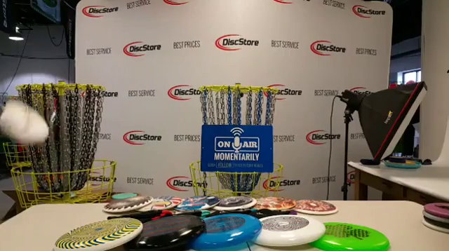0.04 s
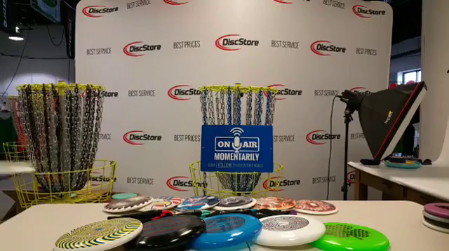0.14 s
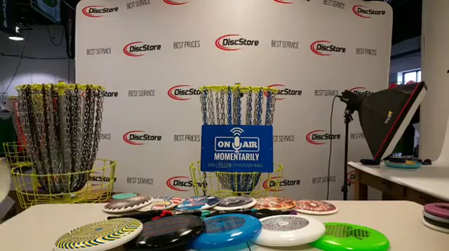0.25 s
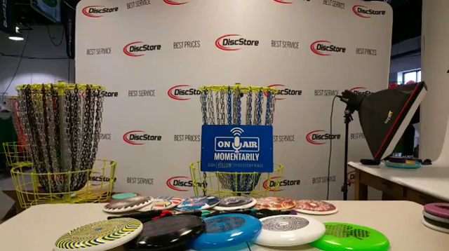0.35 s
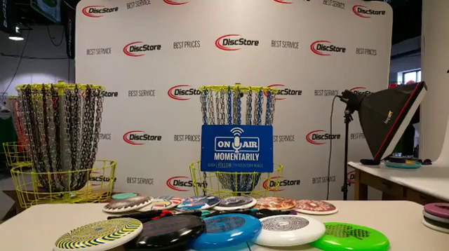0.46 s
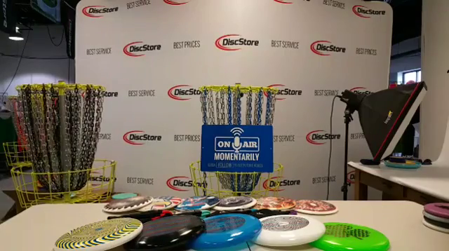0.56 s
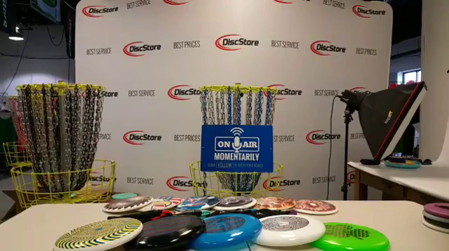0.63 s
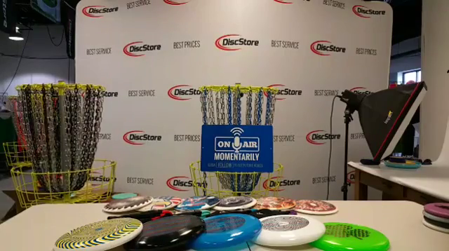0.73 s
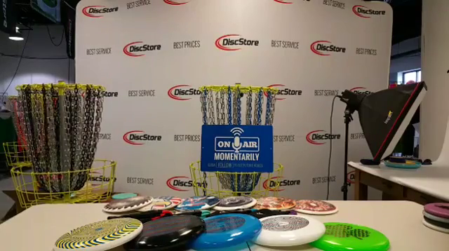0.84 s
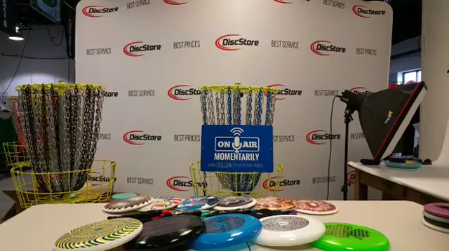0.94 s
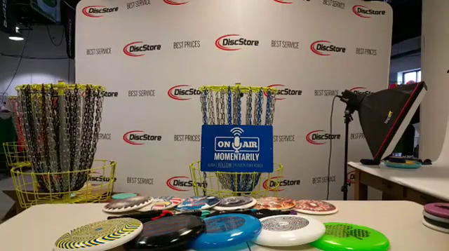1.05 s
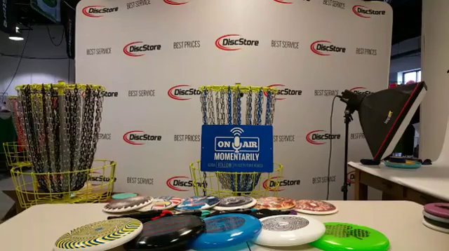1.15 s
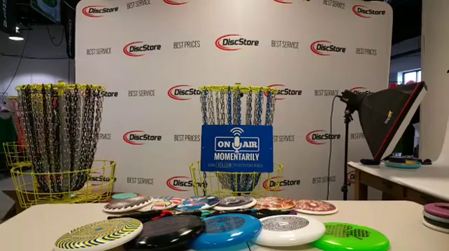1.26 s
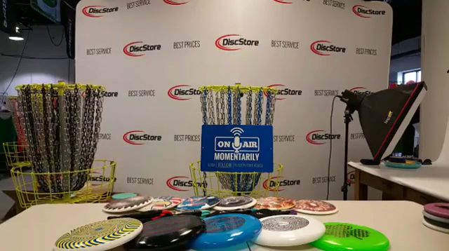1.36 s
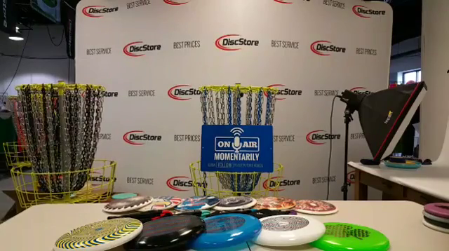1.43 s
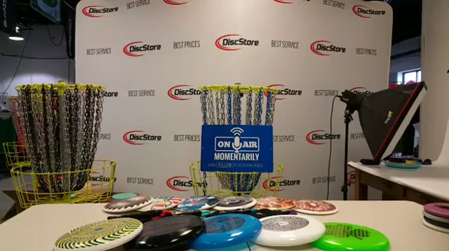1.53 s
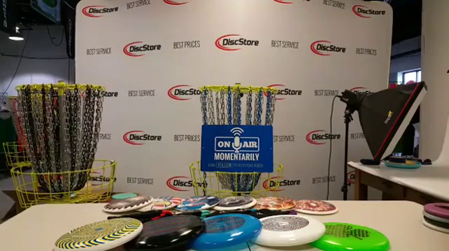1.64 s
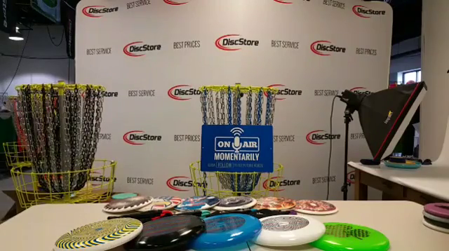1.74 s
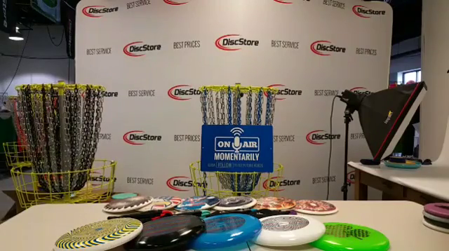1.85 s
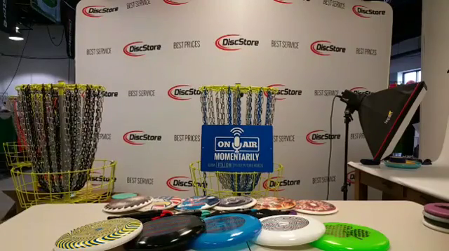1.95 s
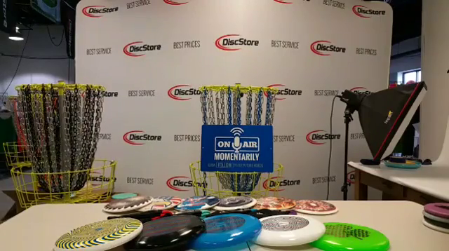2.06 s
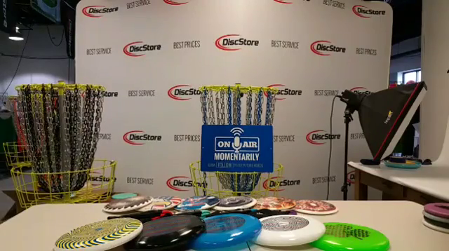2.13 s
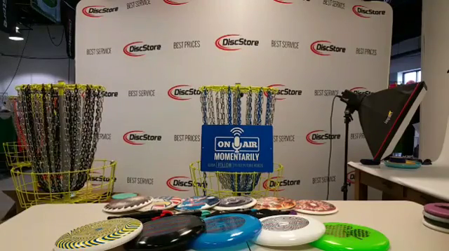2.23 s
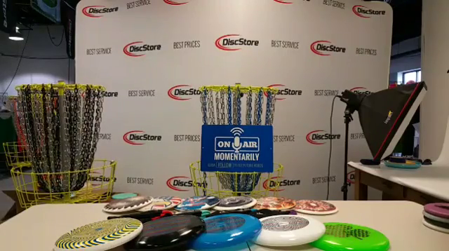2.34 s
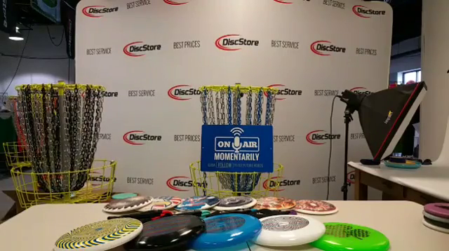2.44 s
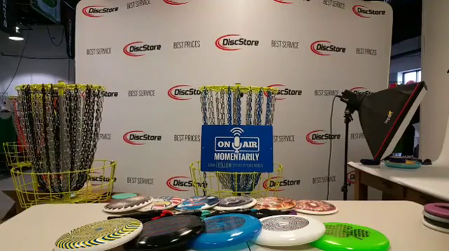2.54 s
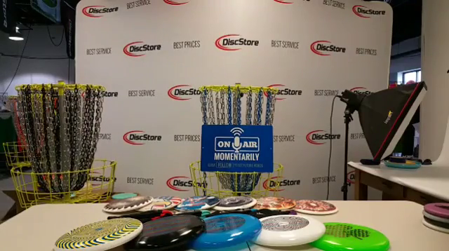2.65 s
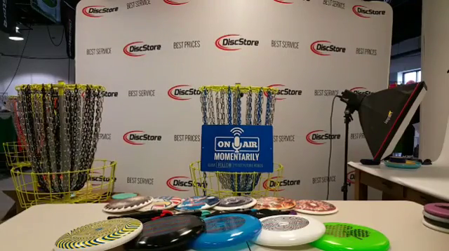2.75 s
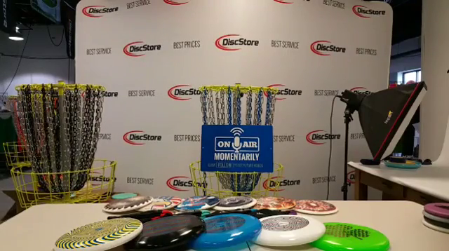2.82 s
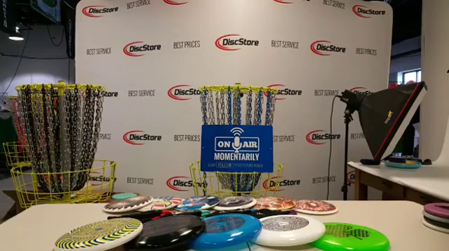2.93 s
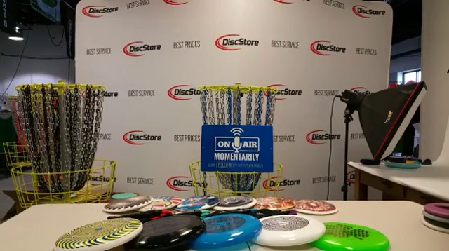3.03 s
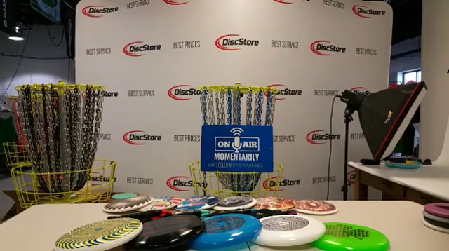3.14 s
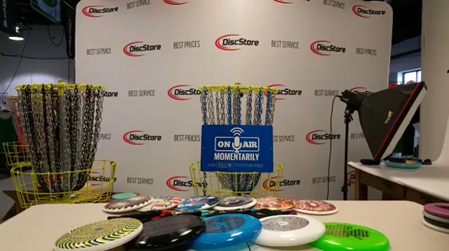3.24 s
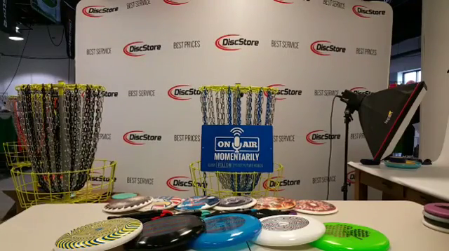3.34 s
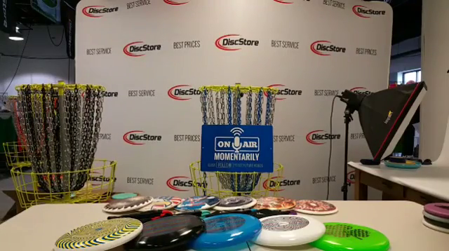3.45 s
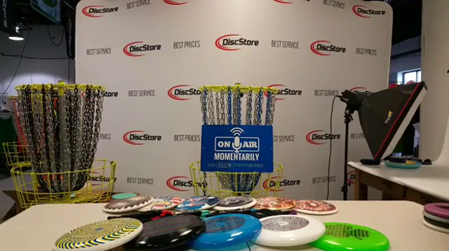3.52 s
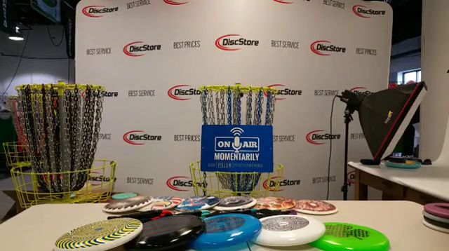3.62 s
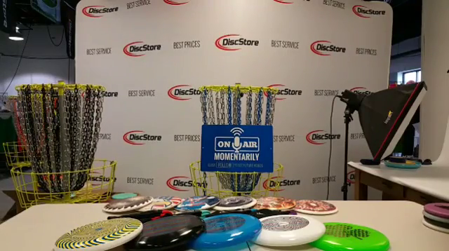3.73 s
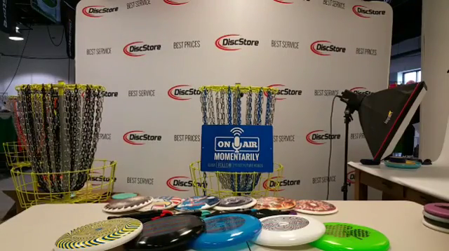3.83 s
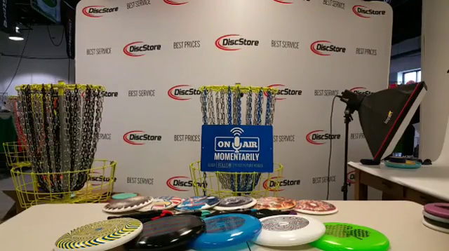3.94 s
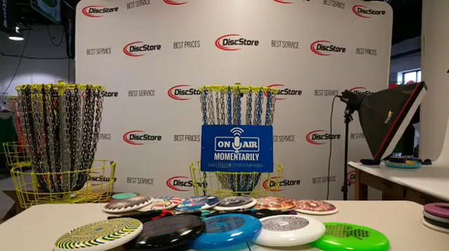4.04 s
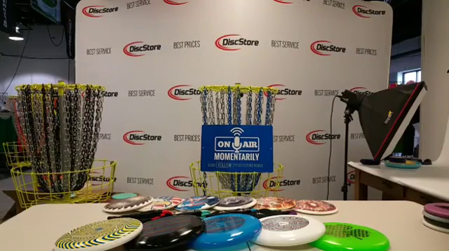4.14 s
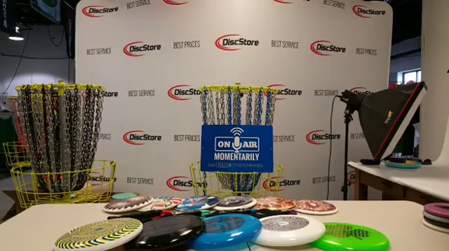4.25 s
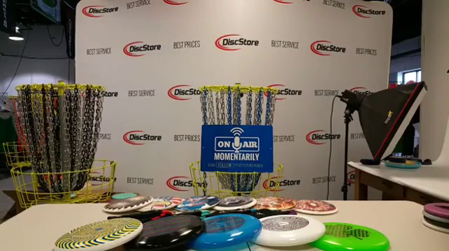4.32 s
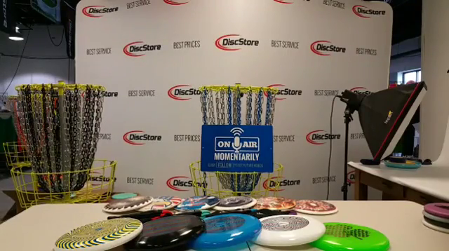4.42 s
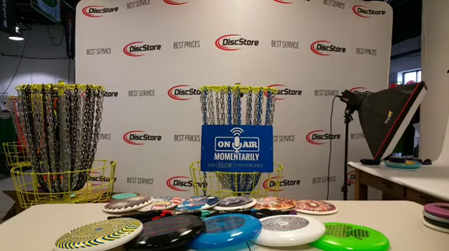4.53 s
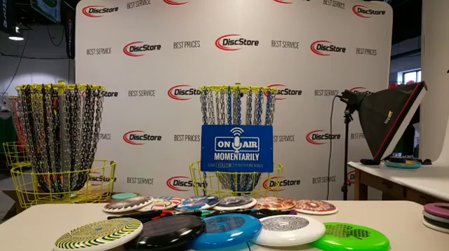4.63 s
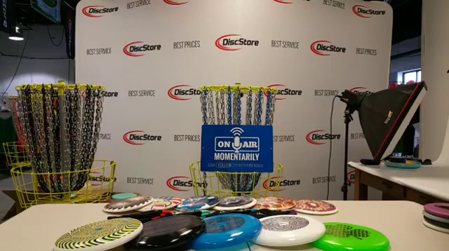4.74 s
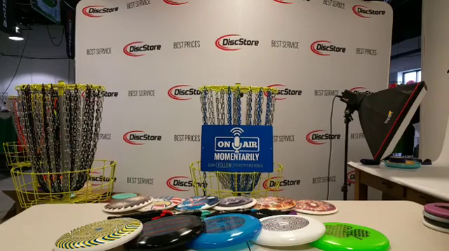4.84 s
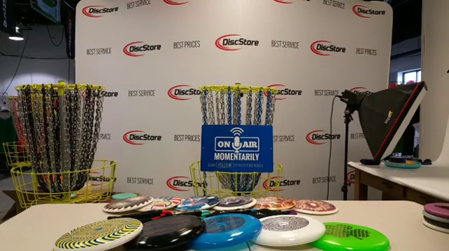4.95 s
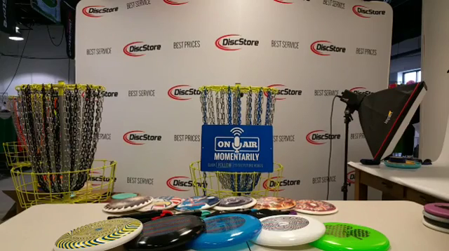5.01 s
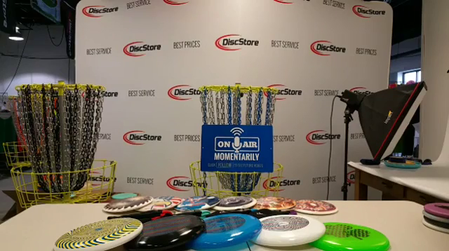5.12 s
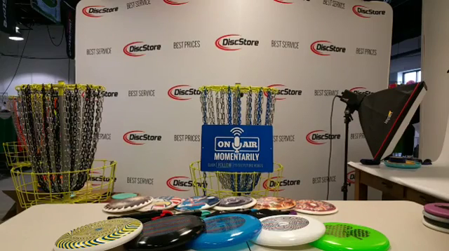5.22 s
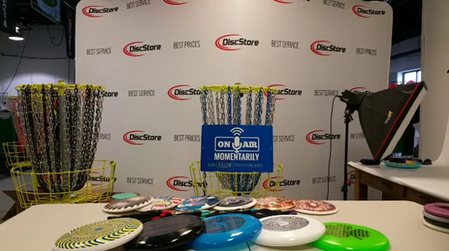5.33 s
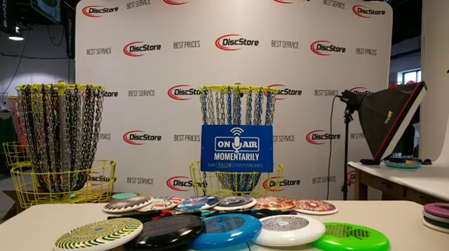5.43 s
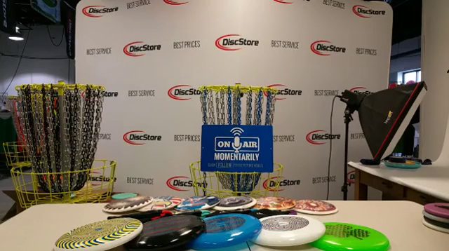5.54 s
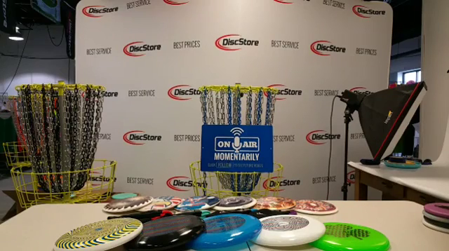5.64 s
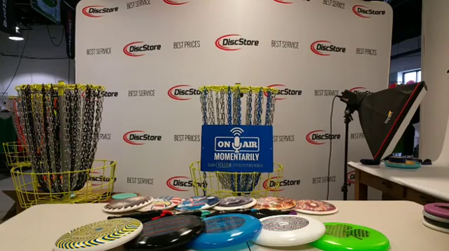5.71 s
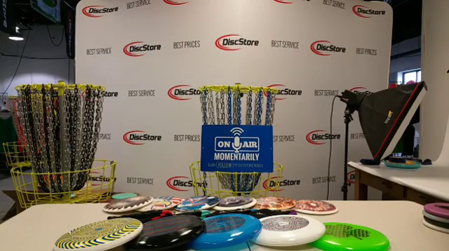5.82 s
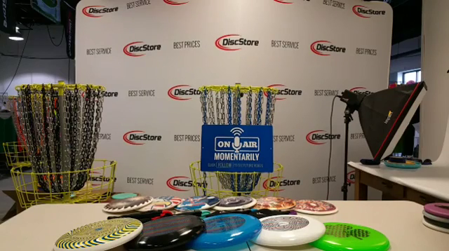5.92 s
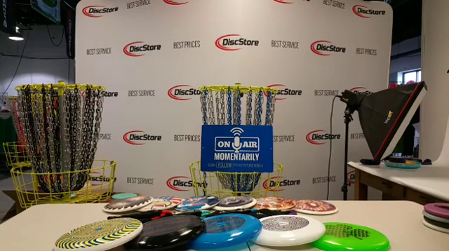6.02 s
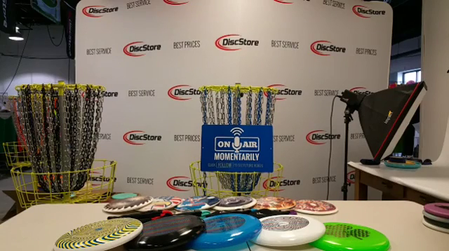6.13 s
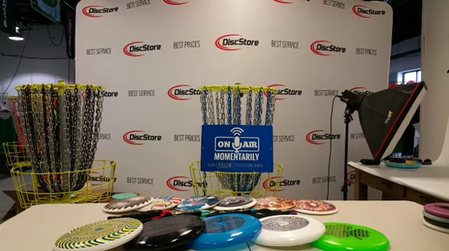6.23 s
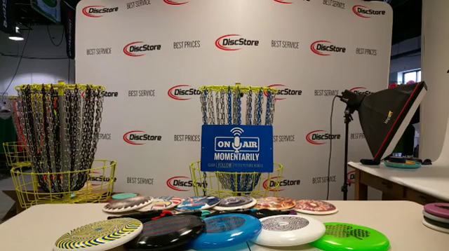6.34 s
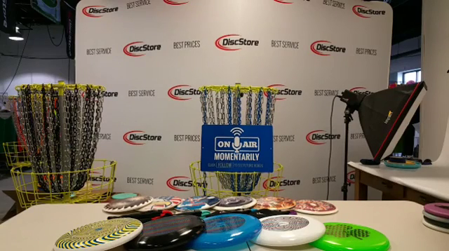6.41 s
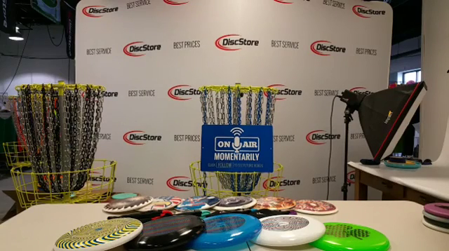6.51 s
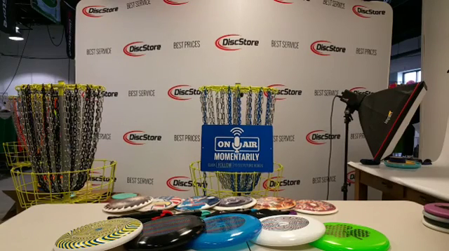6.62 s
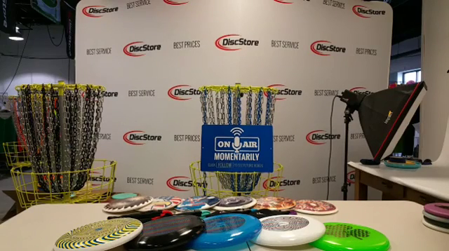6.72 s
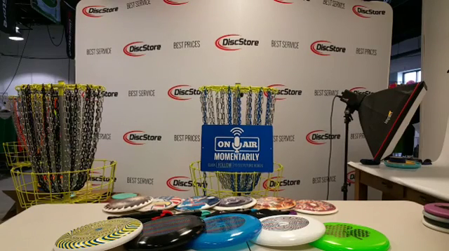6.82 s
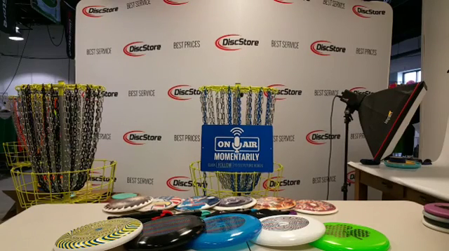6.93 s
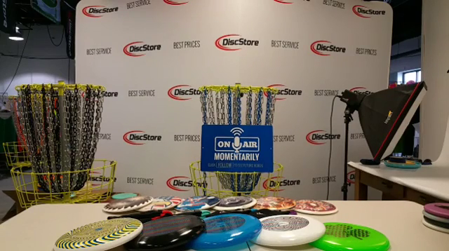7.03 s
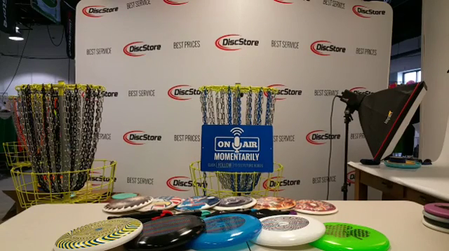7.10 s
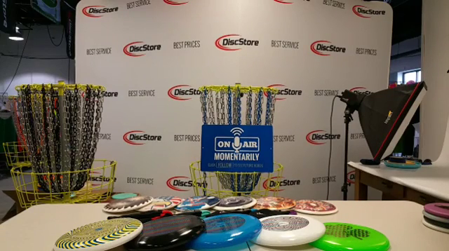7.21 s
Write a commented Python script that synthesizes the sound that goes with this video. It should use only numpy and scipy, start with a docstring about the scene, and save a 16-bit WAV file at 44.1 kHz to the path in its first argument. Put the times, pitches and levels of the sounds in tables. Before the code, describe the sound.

Sudden chain crash and metal clang, hard plastic bounces with fading jingle, a long knocking roll, a sinking hum, a flat slap, then faint rustling.

```python
"""Disc into a chain basket

A plastic flying disc crashes into the chains of a steel basket in a shop, clangs off the wire tray and drops out.
It bounces while the chains jingle, rolls away on its rim, leans and slaps flat; thumps and a brief rustle follow.
Contacts are filtered impulses with noise chatter; links, frame and disc ring as decaying sines.
Rolling, rustle and ventilation are shaped noise; the leaning hum is a sinking sine with noisy resonances.
"""
import sys
import numpy as np
from scipy import signal
from scipy.io import wavfile
from scipy.ndimage import uniform_filter1d

SR = 44100
rng = np.random.default_rng(int(sys.argv[2]) if len(sys.argv) > 2 else 0)


def unload_audio(sound):
    """Save the sound as a 16-bit wav file, at the path given as the first command line argument."""
    columns = np.transpose(np.atleast_2d(sound))
    # keep every value between -1 and 1, then stretch to whole-number steps
    steps = np.round(np.clip(columns, -1, 1) * 32767)
    wavfile.write(sys.argv[1], SR, steps.astype(np.int16))


N = 320552
T = np.arange(N) / SR
EDGE_HZ = 14080  # upper band limit

# Blows: (time [s], relative level over 10 ms [dB], tilt [dB/octave],
#         chatter energy re first contact [dB], chatter t60 [s])
CHAIN_BLOWS = [(.0395, -18, 3, 2.5, 0.031), (.0488, -23.5, 2.5, 3.5, 0.027), (.0522, -20, -0.5, 12, 0.06),
               (.0824, -23.5, -3.5, -2, 0.03)]
TRAY_BLOWS = [(.2385, -38, 7.5, 20, 0.0073), (.2410, -24.5, 4, -11, 0.01), (.2430, -24, 1.5, -8.5, 0.098),
              (.2450, -19, -5.5, 9, 0.034), (.2595, -34.5, -8.5, 1, .05), (.3330, -36, -0.5, 1, 0.029)]
FLOOR_BLOWS = [(.6130, -20.5, 0.5, 0, 0.07), (0.619, -34, 17, 1, 0.063), (0.633, -20.5, -6, -13, 0.051),
               (0.7327, -28, -0.5, 7.5, 0.14), (0.8923, -38.5, 2, 16, 0.14), (.9800, -34.5, 0, 4, 0.15)]
FLAT_BLOWS = [(5.028, -45, -4.5, 1, 0.041), (5.1900, -32, 0.5, -6.5, 0.041)]
THUMP_BLOWS = [(2.085, -57, -6, 5.4, 0.13), (2.305, -55, -3.5, 6, 0.1), (4.493, -51, -2.5, 2.1, 0.026),
               (5.944, -42.5, -1, 4.4, 0.078), (6.716, -59, -0.5, 5.5, 0.034)]
# Contact spectra: (frequency [Hz], relative level [dB per Hz])
CHAIN_SPECTRUM = [(120, -34.5), (200, -6.5), (276, 5), (408, -8), (596, -9.5), (742, -1.5), (910, 0),
                  (1010, -5.5), (1650, -6), (1940, -10.5), (2120, -6.5), (3420, -12.5), (3680, -13),
                  (5790, -27), (6500, -40), (8450, -33), (14300, -120)]
TRAY_SPECTRUM = [(120, -22.5), (200, -23), (334, -7.5), (520, 0.5), (680, 6), (850, -7), (1000, -5),
                 (1120, -6), (1400, -6), (1920, -3), (2100, -7), (2420, -7.5), (2750, -14.5), (3700, -17),
                 (6000, -32), (7800, -55), (14000, -30)]
FLOOR_SPECTRUM = [(29, -69), (50, -21), (109, -8.5), (192, -26.5), (267, 2), (346, -14.5), (504, 1),
                  (581, -9.5), (789, -10), (1070, -15), (2390, -19.5), (5330, -29.5), (8330, -46.5),
                  (11900, -40), (14000, -60)]
FLAT_SPECTRUM = [(60, -22), (150, -16.5), (330, -8), (450, -1), (600, -3.5), (740, -2.5), (1000, -6.5),
                 (1300, -16.5), (1800, -19), (2500, -28.5), (5600, -31.5), (7200, -48), (14000, -63)]
THUMP_SPECTRUM = [(50, -27), (90, -7), (150, -1.5), (310, -6), (380, -8.5), (480, -4), (600, -5),
                  (750, -14), (910, -6.5), (1020, -18), (2000, -25), (5500, -26), (8000, -43), (14000, -35)]
KNOCK_SPECTRUM = [(60, -8), (150, -21.5), (310, 1), (490, 5.5), (600, 4), (780, -2), (1100, -6.5),
                  (1500, -16.5), (2200, -21.5), (4000, -39), (8000, -57.5)]

# Bright clatter: chains shaken together, and the treble of the disc hitting the floor:
# (time [s], relative clinking [dB], settling t60 [s], relative free ringing [dB])
CLATTER = [(0.037, -28.5, 0.3, -38), (0.238, -32.5, 0.12, -46), (0.494, -41, 0.17, -51),
           (.617, -30.5, 0.044, -58), (.750, -52, 0.23, -69), (1.188, -60.5, 0.076, -75),
           (1.51, -63.5, 0.16, -66)]
# Lingering jingle of the swinging chains: (time [s], relative clinking [dB], relative free ringing [dB])
CHAIN_SWAY = [(0.251, -43.5, -53), (.48, -50.5, -42), (.8, -67.5, -71), (1.3, -74, -79), (1.62, -81, -65),
              (1.85, -78.5, -85), (5.8, -78.5, -80)]
# Clink spectrum: (frequency [Hz], relative level [dB])
CLINK_SPECTRUM = [(700, -2.5), (1600, -4.5), (2300, -5), (3000, -4.5), (3800, -1.5), (5000, -8), (6500, -9),
                  (7500, -18.5), (9000, -9), (10000, -12), (12000, -9), (13300, -11), (14300, -5)]
# Loose steel link: (nominal frequency [Hz], relative level [dB])
LOOSE_LINK_MODES = [(2169, -49), (2245, -65), (2396, -59), (3644, -55), (3790, -62), (4543, -65.5),
                    (6110, -60), (8764, -57.5), (8861, -63), (10207, -66), (10955, -51.5), (11946, -70),
                    (13124, -53), (13170, -56)]
LINK_T60_S = 0.35
# Single links: (time [s], amplitude per link [dB], centre frequency [Hz], t60 [s])
LINK_PINGS = [(0.138, -57, 8300, .12), (.400, -69, 7960, 0.12), (0.498, -52, 6670, 0.23),
              (.498, -61, 7200, 0.07), (.752, -54.5, 3750, 0.11), (0.769, -52.5, 3055, 0.11),
              (0.754, -73, 12600, 0.098), (1.515, -62.5, 3870, 0.13), (4.399, -78.5, 3940, 0.39)]

# Steel frame and tray: (frequency [Hz], relative level [dB], t60 [s])
FRAME_MODES = [(80.3, -8.5, 0.65), (242.6, -3, 0.461), (282, -16, 0.2), (522, 0.5, 0.88), (764, -11.5, 1.4),
               (930, -12, .3), (996, -9, .3), (1292, -20, .55), (1440, -17.5, 0.42), (1841, -7.5, 0.55),
               (2280, -9.5, 2.4), (2245, -11.5, 0.77), (2600, -13, 0.33), (2642, -37, .3), (3680, -6, 0.35),
               (3800, -32, .6)]
# Knocks on the frame: (time [s], gain [dB])
FRAME_KNOCKS = [(0.049, -39.5), (.243, -40.5)]
# Disc flexing against the floor: (frequency [Hz], relative level [dB], t60 [s])
DISC_BOOM_MODES = [(82, -14, 0.86), (239, -0.5, 0.32), (291, -10, 0.2), (339.5, -0.5, 0.2),
                   (483.4, 6.5, 0.18), (589, -29, .22), (725, -29, 0.25), (800, -20, 0.077)]
# Disc lying on the floor: (frequency [Hz], amplitude [dB], t60 [s])
DISC_FLAT_MODES = [(472, -39.5, 0.21), (580, -51, 0.42), (746, -41, 0.36), (2070, -75, 0.22),
                   (2390, -55, .2)]

# Rumble of the rolling rim: (time [s], relative level [dB])
ROLL_LEVEL = [(1.0, -53.5), (1.23, -59.5), (3.74, -56.5), (3.86, -52.5), (4.46, -57), (4.72, -50.5),
              (5.0, -62)]
# Rumble spectrum: (frequency [Hz], relative level [dB per Hz])
ROLL_SPECTRUM = [(65, -61), (110, -25), (178, -7.5), (215, -27), (306, -1), (395, -17), (478, 5), (526, -8),
                 (588, -3), (647, -9.5), (748, -3), (810, -24.5), (1060, -11.5), (1440, -27), (5000, -38.5),
                 (6500, -87), (11000, -120)]
SKID_DB, SKID_S = 14, 0.23  # the rim skids at first, until it grips
# Separate rim knocks: last hops of the landing, then irregular knocks while rolling:
# (time [s], relative level [dB], tilt [dB/octave])
SEPARATE_KNOCKS = [(1.017, -32, 0), (1.091, -33, 2.5), (1.145, -36, 3.5), (1.498, -41.5, 4),
                   (1.93, -43.5, 2.5), (2.185, -43.5, 5), (2.334, -38.5, .5), (2.766, -45.5, 2),
                   (2.998, -40.5, 3), (3.495, -38, 1.5), (4.437, -42.5, 4.5), (4.649, -42, 5.5)]
# A nick in the rim knocks once a turn; levels here are relative
TURN_START_S, TURN_S, TURN_COUNT = 1.562, 0.2515, 8
TURN_DB, TURN_FADE_DB_PER_S, TURN_TILT_DB_PER_OCT = -37, -4.5, 1.5
# The disc then wobbles: each interval is a share of the one before
WOBBLE_START_S, WOBBLE_S, WOBBLE_SHARE, WOBBLE_COUNT = 3.692, 0.158, 0.955, 10
WOBBLE_DB, WOBBLE_FADE_DB_PER_S, WOBBLE_TILT_DB_PER_OCT = -37, -8, 0.5
# Grit under the rim, met at random
GRIT_PER_S, GRIT_DB, GRIT_SPREAD_DB, GRIT_TILT_DB_PER_OCT = 6.1, -52, 3, 1

# Leaning disc rocking onto its humming rim: (time [s], relative level [dB], t60 [s])
LEAN_ROCKS = [(4.698, -45.5, 0.61), (4.774, -45.5, 0.5), (4.879, -35.5, 0.066)]
HUM_HZ, SAG_START_S, SAG_HZ_PER_S = 492, 4.71, 330
HUM_RISE_S, HUM_ROUGH_GAIN = 0.0042, 0.4

# Ticks: (time [s], level over 10 ms [dB], centre frequency [Hz], half-width at -6.5 dB [octaves])
SMALL_TICKS = [(3.526, -66.5, 7000, 1), (4.834, -60, 1250, 0.55), (5.009, -64, 1695, 0.31),
               (6.663, -65, 8900, 0.97), (6.993, -73, 5700, 0.17)]
# Rustle: (time [s], relative level [dB])
RUSTLE_LEVEL = [(5.95, -70), (6.13, -73), (6.35, -78), (6.49, -77), (6.57, -68), (6.66, -74), (6.71, -81)]
# Rustle spectrum: (frequency [Hz], relative level [dB per Hz])
RUSTLE_SPECTRUM = [(1000, 2), (3000, 2), (6000, -3), (9000, -9.5), (14000, -3.5)]

# Air noise spectrum: (frequency [Hz], relative level [dB per Hz])
AIR_SPECTRUM = [(15, -55.5), (25, -34), (42, -21), (80, -8), (144, -10.5), (231, -3), (271, -9),
                (353, -2.5), (436, -7), (569, -12.5), (666, -10), (1290, -12), (1780, -17), (3350, -24),
                (14000, -36.5)]
AIR_RMS_DB = -64.5
# Fan lines: (frequency [Hz], rms level [dB])
FAN_TONES = [(362, -74.5), (396, -86), (465, -77), (582, -76), (718, -79), (1310, -80)]
# Near reflections: (delay [s], relative gain [signed ratio])
NEAR_ECHOES = [(.0068, 1), (.0085, -0.035), (0.0137, -0.63), (0.0213, 0.33)]
# Room decay: (frequency [Hz], t60 [s])
ROOM_DECAY = [(100, 0.33), (400, 0.47), (1000, 0.418), (3000, 0.46), (7000, 0.36), (14000, 0.19)]


def amp(db):
    """Decibels to amplitude ratio."""
    return 10 ** (np.asarray(db) / 20)


def unit(x):
    """Scale to an rms of 1."""
    return x / np.sqrt(np.mean(x ** 2) + 1e-20)


def read(points, hz):
    """Interpolate a table on a log-frequency axis."""
    f, value = np.transpose(points)
    return np.interp(np.log(hz + 1), np.log(f + 1), value)


def fade(t, t60):
    """Exponential decay by 60 dB in t60 seconds, 1 ms at least."""
    return np.exp(-np.log(1000) * t / np.maximum(t60, 1e-3))


def level(s, db):
    """Gain curve, linear in dB, silent outside its span."""
    return amp(np.interp(T, s, db)) * (T > s[0]) * (T < s[-1])


def add(mix, s, sound):
    """Mix a sound in at s seconds."""
    part = mix[max(round(s * SR), 0):][:len(sound)]
    part += sound[:len(part)]


def colour(x, tone, tilt_db=0, lag=0, size=8192):
    """Causal filter from a spectrum, tilted in dB/octave; low bending waves trail the high by lag seconds."""
    hz = np.fft.fftfreq(size, 1 / SR)
    octaves = np.log2(np.clip(abs(hz), 200, 6000) / 1000)
    log_gain = np.log(amp(np.maximum(read(tone, abs(hz)) + tilt_db * octaves, -100)))
    minimum_phase = np.conj(signal.hilbert(log_gain))
    dispersion = 2 * np.pi * lag * 4000 * np.arctan(hz / 4000)
    taps = np.fft.ifft(np.exp(minimum_phase - 1j * dispersion)).real
    return signal.oaconvolve(x, taps[:size // 2])[:len(x)]


def ring(modes):
    """Sum of decaying sine modes, cut at one second."""
    t = T[:SR]
    return sum(amp(db) * fade(t, t60) * np.sin(2 * np.pi * hz * t) for hz, db, t60 in modes)


def blow(tone, db, tilt_db, chatter_db, chatter_t60, lag=0):
    """A sharp contact, then a quick chatter of smaller ones."""
    t = T[:SR // 4]
    chatter = rng.standard_normal(len(t)) * rng.exponential(1, len(t)) * fade(t, chatter_t60)
    force = amp(chatter_db) * chatter / np.linalg.norm(chatter)
    force[0] += 1
    sound = colour(force, tone, tilt_db, lag)
    return amp(db) * sound / np.linalg.norm(sound) * np.sqrt(SR / 100)  # level over 10 ms


def blows(rows, tone, lag=0):
    """Play a table of contacts with one spectrum."""
    out = np.zeros(N)
    for s, *shape in rows:
        add(out, s, blow(tone, *shape, lag))
    return out


def fuzzy_tone(hz, width_hz):
    """A narrow resonance fed by noise, following a pitch curve."""
    noise = rng.standard_normal(N) + 1j * rng.standard_normal(N)
    wander = signal.sosfilt(signal.butter(2, width_hz / 2, fs=SR, output="sos"), noise)
    carrier = np.exp(2j * np.pi * np.cumsum(hz * np.ones(N)) / SR)
    return unit((wander * carrier).real)


def basket():
    """The disc strikes the chains, then the tray; bright clatter and link pings go with it."""
    chain_hits = amp(-3.5) * blows(CHAIN_BLOWS, CHAIN_SPECTRUM, lag=0.0027)
    tray_hits = blows(TRAY_BLOWS, TRAY_SPECTRUM, lag=0.00195)
    return chain_hits + tray_hits + clatter() + pings()


def clatter(clinks_per_s=1000, rise_s=0.0014, clink_t60_s=0.074, detune=0.00059, count=28):
    """Random showers of short clinks and ringing loose links: shaken chains, and the floor hit's treble."""
    sway_s, sway_clink_db, sway_ring_db = np.transpose(CHAIN_SWAY)
    clinking = level(sway_s, sway_clink_db)
    ringing = level(sway_s, sway_ring_db)
    for s, clink_db, t60, ring_db in CLATTER:
        swell = (1 - np.exp(-T[:SR] / rise_s)) * fade(T[:SR], t60)
        add(clinking, s, amp(clink_db) * swell)
        add(ringing, s, amp(ring_db) * swell)

    t, clinks, rings = T[:SR // 3], np.zeros(N), np.zeros(N)
    for _ in range(count):
        at = rng.integers(0, N, round(clinks_per_s / count * N / SR))
        strength = rng.choice([-1, 1], len(at)) * rng.uniform(0.37, 1.69, len(at))
        hits = np.zeros(N)
        hits[at] = strength * np.sqrt(SR / clinks_per_s)

        pinched_hz = rng.uniform(1169, EDGE_HZ, size=(16, 1))
        pinched = np.sin(2 * np.pi * pinched_hz * t).sum(0) * fade(t, clink_t60_s)
        pinched[0] += 22  # the bare tick of steel on steel
        pinched = colour(pinched, CLINK_SPECTRUM)

        loose = np.zeros(len(t))
        for hz, db in LOOSE_LINK_MODES:
            link_hz = hz * (1 + detune * rng.standard_normal())
            loose += amp(db) * np.sin(2 * np.pi * link_hz * t)
        loose *= fade(t, LINK_T60_S)

        clinks += signal.oaconvolve(hits * clinking, pinched / np.linalg.norm(pinched))[:N]
        rings += signal.oaconvolve(hits * ringing, loose / np.linalg.norm(loose))[:N]
    return amp(-0.5) * clinks + amp(-11) * rings


def pings(spread=0.042, count=6):
    """A few neighbouring links of nearly the same pitch ring as single decaying sines."""
    out = np.zeros(N)
    for s, db, hz, t60 in LINK_PINGS:
        for z, late_s in zip(rng.standard_normal(count), rng.exponential(0.0026, count)):
            add(out, s + late_s, ring([(hz * (1 + spread * z), db, t60)]))
    return out


def bounces():
    """The disc lands on its edge and hops; at the end of its roll it slaps down flat."""
    hops = amp(-4) * blows(FLOOR_BLOWS, FLOOR_SPECTRUM, lag=0.000995)
    slaps = blows(FLAT_BLOWS, FLAT_SPECTRUM, lag=0.00034)
    return hops + slaps


def resonances(boom_db=-16):
    """The frame rings after two knocks; the disc booms at each floor contact and rings once it lies flat."""
    out, frame, boom = np.zeros(N), ring(FRAME_MODES), ring(DISC_BOOM_MODES)
    for s, db in FRAME_KNOCKS:
        add(out, s, amp(db) * frame)
    for s, db, *_ in FLOOR_BLOWS:
        add(out, s, amp(db + boom_db) * boom)
    add(out, FLAT_BLOWS[-1][0], ring(DISC_FLAT_MODES))
    return out


def rolling(grain_db=3, knock_db=-8):
    """The grain of the floor drums on the rim; knocks make it chatter."""
    grain = amp(grain_db * unit(uniform_filter1d(rng.standard_normal(N), 250)))
    skid = amp(SKID_DB * np.clip(1 - (T - ROLL_LEVEL[0][0]) / SKID_S, 0, 1))
    rumble = unit(colour(rng.standard_normal(N) * grain, ROLL_SPECTRUM, tilt_db=-0.23))
    out = amp(-2) * rumble * level(*np.transpose(ROLL_LEVEL)) * skid
    for s, db, tilt_db in [*SEPARATE_KNOCKS, *rim_knocks()]:
        add(out, s, blow(KNOCK_SPECTRUM, db + knock_db, tilt_db, chatter_db=4, chatter_t60=0.13, lag=0.001))
    return out


def rim_knocks():
    """Rows (s, dB, dB/octave): one knock a turn, then a quickening wobble, with grit all the way."""
    turns_s = TURN_S * np.arange(TURN_COUNT)
    # partial sums of the geometric intervals
    swings_s = WOBBLE_S * (1 - WOBBLE_SHARE ** np.arange(WOBBLE_COUNT)) / (1 - WOBBLE_SHARE)
    start_s = ROLL_LEVEL[0][0]
    length_s = LEAN_ROCKS[-1][0] - start_s
    knocks = []
    for s in turns_s:
        knocks.append((TURN_START_S + s, TURN_DB + TURN_FADE_DB_PER_S * s, TURN_TILT_DB_PER_OCT))
    for s in swings_s:
        knocks.append((WOBBLE_START_S + s, WOBBLE_DB + WOBBLE_FADE_DB_PER_S * s, WOBBLE_TILT_DB_PER_OCT))
    for place, size in rng.random((round(GRIT_PER_S * length_s), 2)):
        grit_db = GRIT_DB + GRIT_SPREAD_DB * (2 * size - 1)
        knocks.append((start_s + length_s * place, grit_db, GRIT_TILT_DB_PER_OCT))
    return knocks


def leaning(overtone_db=-17):
    """Two plate resonances sink in pitch and pulse as the disc wobbles over."""
    sag_s = np.clip(T, SAG_START_S, FLAT_BLOWS[0][0]) - SAG_START_S
    pitch_hz = HUM_HZ - SAG_HZ_PER_S * sag_s
    pressure = np.zeros(N)
    for s, db, t60 in LEAN_ROCKS:
        add(pressure, s, amp(db) * (1 - np.exp(-T[:SR] / HUM_RISE_S)) * fade(T[:SR], t60))
    hum = unit(np.sin(2 * np.pi * np.cumsum(pitch_hz) / SR))
    hum += HUM_ROUGH_GAIN * fuzzy_tone(pitch_hz, width_hz=130)
    overtone = amp(overtone_db) * fuzzy_tone(2.13 * pitch_hz, width_hz=125)
    return pressure * (hum + overtone)


def handling():
    """Soft low contacts, a light noise rustle and band-limited ticks."""
    out = amp(0.5) * blows(THUMP_BLOWS, THUMP_SPECTRUM)
    rustle = unit(colour(rng.standard_normal(N), RUSTLE_SPECTRUM))
    out += amp(1) * rustle * level(*np.transpose(RUSTLE_LEVEL))
    for s, db, hz, width_oct in SMALL_TICKS:
        band = [(hz * 4 ** (k * width_oct), -13 * k ** 2) for k in range(-2, 3)]
        add(out, s, blow(band, db, 0, chatter_db=14, chatter_t60=0.022))
    return out


def ventilation():
    """Steady air noise with faint wavering fan lines."""
    air = amp(AIR_RMS_DB) * unit(colour(rng.standard_normal(N), AIR_SPECTRUM))
    fan = sum(amp(db) * fuzzy_tone(hz, width_hz=17) for hz, db in FAN_TONES)
    return air + fan


def room(x, echo_db, tail_db, onset_s=0.0013, lowest_hz=75):
    """Direct sound, near reflections and a diffuse tail; small objects radiate no deep bass."""
    hz, t, z = signal.stft(rng.standard_normal(SR), SR, nperseg=256)
    decaying = z * fade(t, read(ROOM_DECAY, hz)[:, None])
    tail = signal.istft(decaying, SR, nperseg=256)[1][:SR]
    tail *= 1 - np.exp(-(T[:SR] / onset_s) ** 2)
    response = amp(tail_db) * tail / np.linalg.norm(tail)
    response[0] += 1
    dull = fade(T[:128], 0.001)  # soft surfaces take the treble out of the echoes
    for s, gain in NEAR_ECHOES:
        add(response, s, amp(echo_db) * gain * dull / dull.sum())
    high_pass = signal.butter(3, lowest_hz, "high", fs=SR, output="sos")
    return signal.sosfilt(high_pass, signal.oaconvolve(x, response)[:N])


def scene():
    """Basket, floor and small sounds share the shop."""
    mix = room(basket(), echo_db=-20.5, tail_db=-10.5)
    mix += room(bounces() + rolling(), echo_db=-7.5, tail_db=-7)
    mix += resonances() + leaning()
    mix += room(handling(), echo_db=-19, tail_db=-4.5)
    mix += ventilation()
    return mix[None]


def record(dry):
    """Linear-phase low-pass at EDGE_HZ."""
    low_pass = signal.firwin(301, EDGE_HZ, window=("kaiser", 8), fs=SR)
    return signal.oaconvolve(dry, low_pass[None], "same")


dry = scene()
out = record(dry)
unload_audio(out)
```